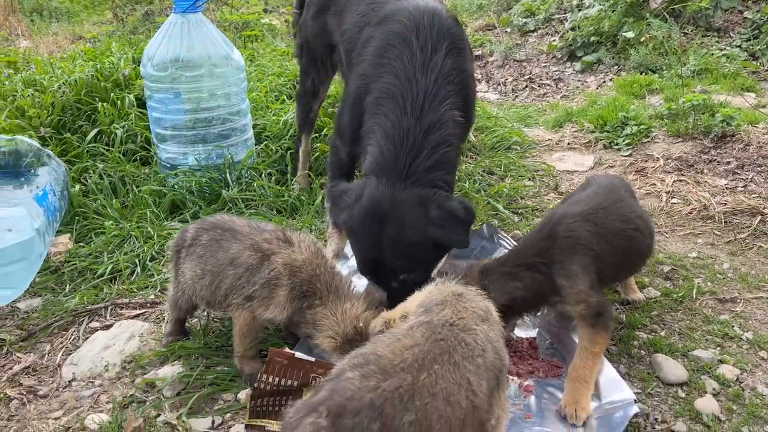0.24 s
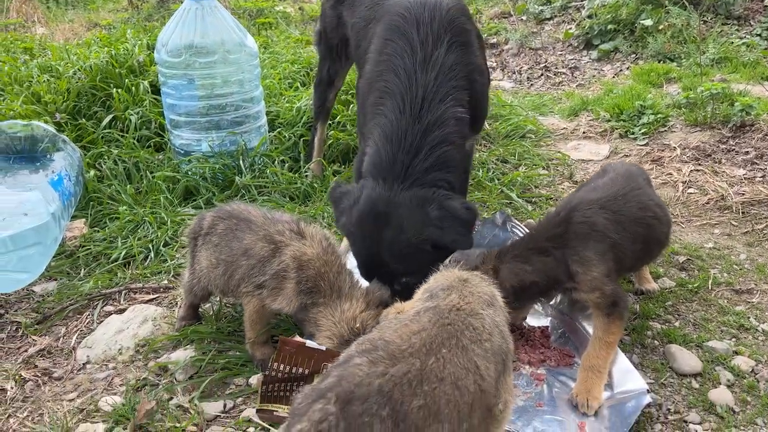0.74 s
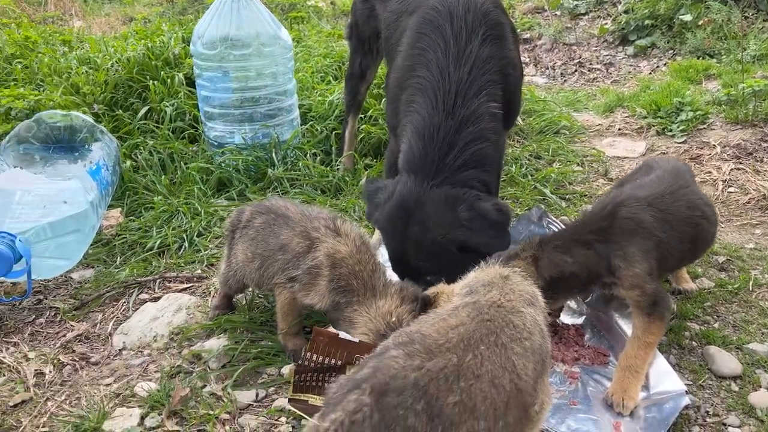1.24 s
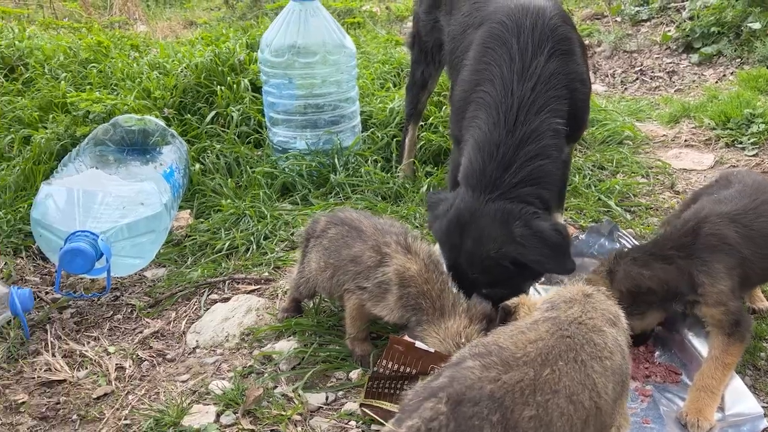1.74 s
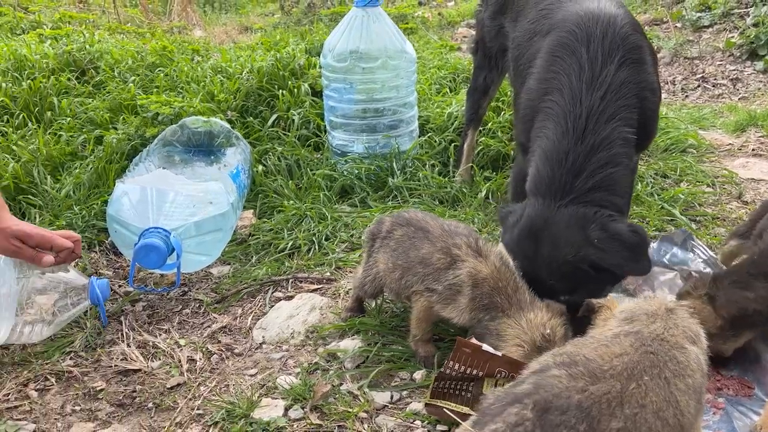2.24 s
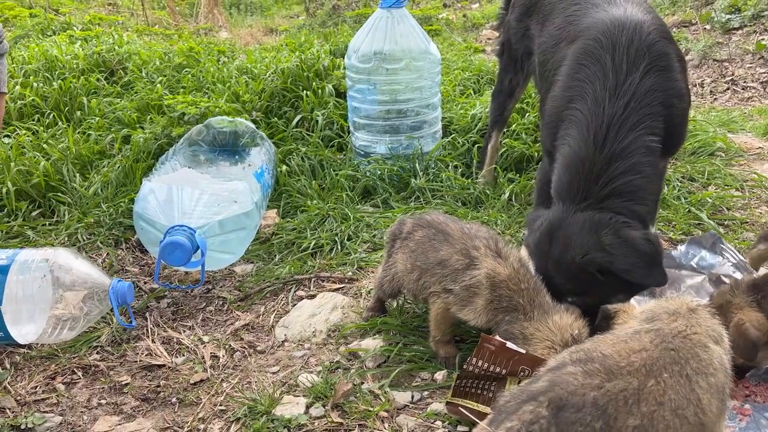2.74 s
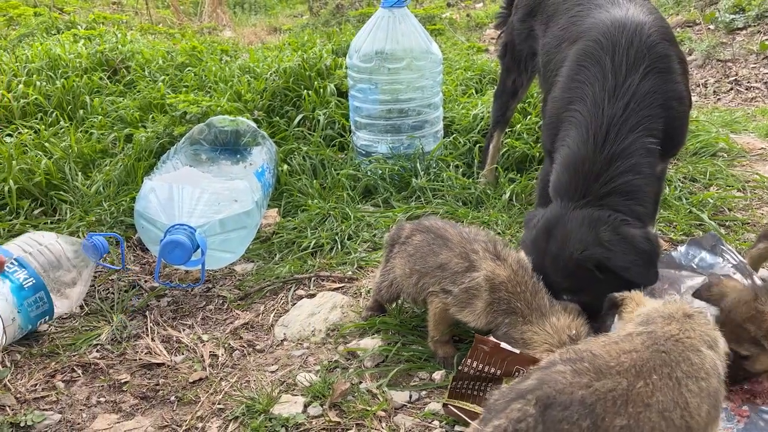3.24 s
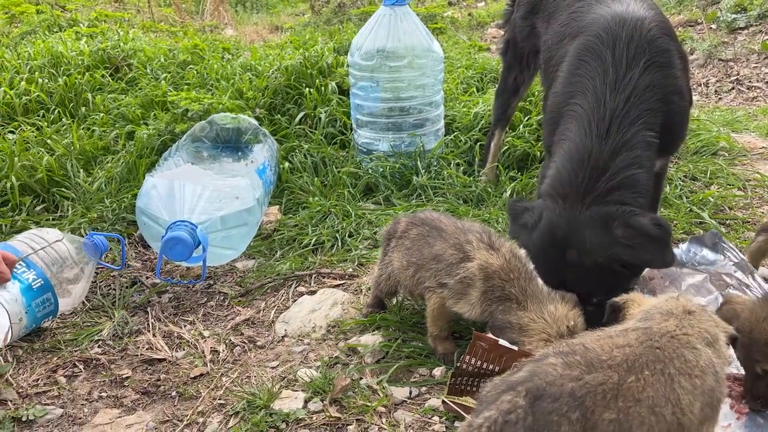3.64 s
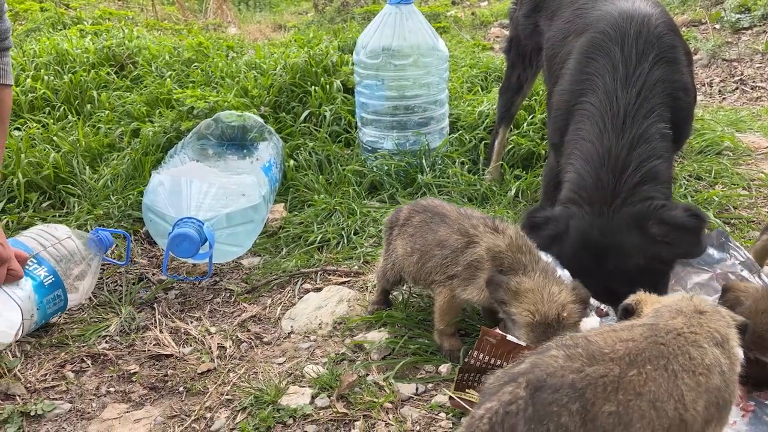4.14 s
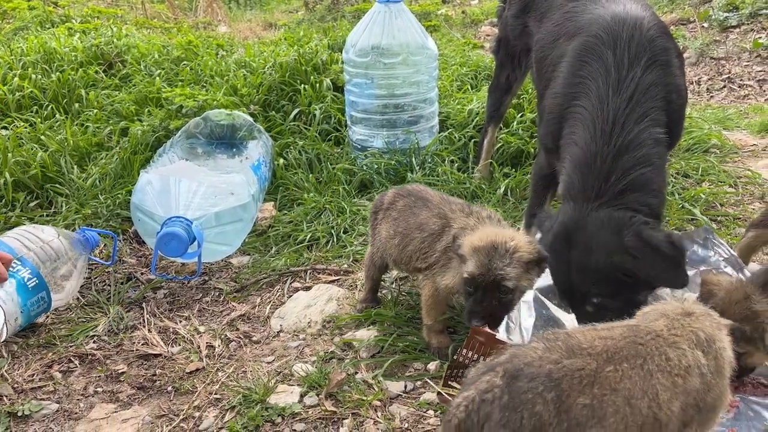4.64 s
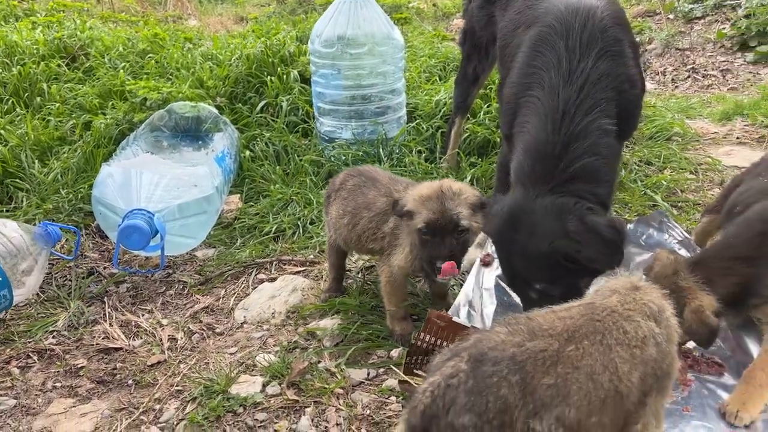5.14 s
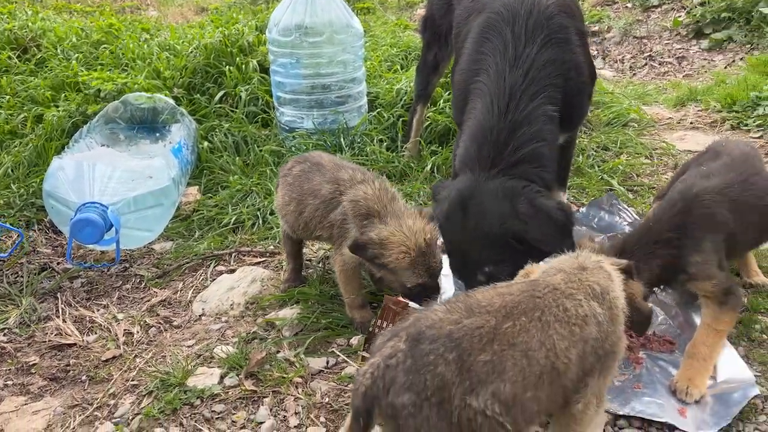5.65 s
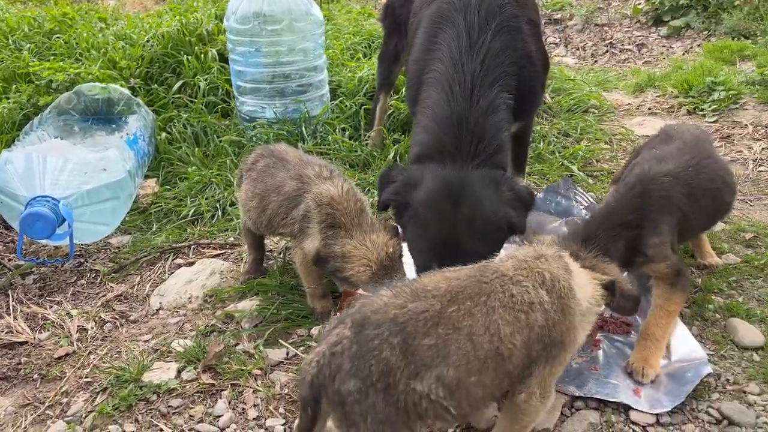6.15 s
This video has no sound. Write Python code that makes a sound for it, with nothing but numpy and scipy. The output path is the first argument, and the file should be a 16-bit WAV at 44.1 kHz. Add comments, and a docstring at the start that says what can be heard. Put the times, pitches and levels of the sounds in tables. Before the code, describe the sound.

Wet, hollow smacks and sharp plastic crackles come in an irregular stream as puppies feed from plastic bags on the ground. Small squelchy pops and a fine licking rustle fill the gaps. After a dense opening the sounds space out, a nose snorts briefly, and more smacks lead to one crisp snap at the end. It is all heard close up, over a low outdoor rumble.

```python
"""Puppies lapping wet food off plastic sheets

Under muzzles and paws the film buckles: single creases snap, crowds of them scrunch, and both excite
the modes of the sheet. Mouths smack open as hollow cavity resonances, air pockets burst in the food,
paws thud and a nose snorts. A fine rustle swells in between, with one faint squeak.
Two microphone ports pick it all up from close by, over a distant outdoor rumble."""
import sys
import numpy as np
from scipy import signal
from scipy.fft import rfft, irfft
from scipy.io import wavfile
from scipy.ndimage import uniform_filter1d

SR = 44100
rng = np.random.default_rng(int(sys.argv[2]) if len(sys.argv) > 2 else 0)


def master(y):
    """Save y as 16-bit WAV."""
    cut = np.clip(np.atleast_2d(y).T, -1, 1)
    pcm = np.round(cut * 32767)  # scale
    wavfile.write(sys.argv[1], SR, pcm.astype(np.int16))


N = 282240
HZ = np.fft.rfftfreq(N, 1 / SR)

# Spectra of the creasing film and of its airy treble: (frequency [Hz], spectral density [dB])
FILM_SPECTRUM = [(400, 19), (800, -3.5), (1300, -4), (2000, -0.5), (2700, 5), (3300, 0), (4500, -2.5),
                 (5500, -7), (6200, -4.5)]
SHEEN_SPECTRUM = [(5000, 5), (6500, 1.5), (7700, -0.5), (9000, 3), (11500, 2), (14000, -5.5), (15300, -7.5),
                  (16000, -53)]
# Mouths smacking open: (time [s], level [dB], cavity frequency [Hz], length [cycles])
MOUTH_SMACKS = [(0.0955, -3.5, 410, 3.2), (0.245, -17.5, 375, 6.6), (0.305, -17, 317, 5.6),
                (0.526, -13, 173, 3.6), (0.684, -17.5, 282, 1.3), (0.819, -32, 177, 3.1),
                (1.006, -17.5, 224, 2), (1.068, -25, 191, 1.7), (1.165, -21.5, 392, 9.7),
                (1.203, -16.5, 212, 2.3), (1.257, -9, 254, 2.2), (1.305, -11.5, 686, 4.5),
                (1.317, -27, 267, 2.9), (1.359, -24.5, 250, 4.1), (1.477, -20.5, 225, 2.5),
                (1.523, -24.5, 253, 1.4), (1.599, -15, 262, 2.15), (1.66, -13, 272, 2.3),
                (1.699, -10.5, 272, 3.6), (1.765, -9, 394, 2.6), (1.79, -16, 274, 6.3),
                (1.838, -24, 254, 1.7), (1.872, -19.5, 263, 3.5), (2.024, -13.5, 274, 5.2),
                (2.075, -25.5, 225, 4.2), (2.188, -18.5, 332, 4.2), (2.204, -16.5, 282, 9.8),
                (2.25, -30, 288, 1.7), (2.313, -30.5, 242, 7), (2.53, -27, 242, 13),
                (2.629, -17.5, 245, 6.1), (2.863, -18, 285, 6.7), (3.023, -14, 292, 5.5),
                (3.085, -15, 375, 2.6), (3.172, -13.5, 292, 3.5), (3.379, -18.5, 243, 7.6),
                (3.599, -26, 260, 2.9), (3.797, -24.5, 287, 3), (4.337, -18, 285, 4.2),
                (4.388, -16.5, 257, 6.1), (4.554, -23, 159, 7.4), (4.824, -16, 231, 5.3),
                (5.194, -20, 200, 1.35), (5.324, -18, 407, 3.4), (5.392, -25, 385, 5.9),
                (5.434, -23.5, 437, 5.5), (5.746, -25.5, 197, 0.91), (5.778, -9, 348, 6),
                (5.88, -27.5, 188, 4.6), (6.274, -18, 424, 1.8), (6.29, -21, 427, 5.8)]


def undb(db):
    """Amplitude ratio of a level in decibels."""
    return 10 ** (np.asarray(db) / 20)


def unit(x):
    """Normalisation to an rms of 1."""
    return x / np.sqrt(np.mean(x ** 2))


def unit_peak(x):
    """Normalisation to a peak of 1."""
    return x / np.max(np.abs(x))


def add(out, start, x):
    """Superposition of a short sound at a start time in seconds."""
    i = max(int(start * SR), 0)
    out[i:i + len(x)] += x[:N - i]


def curve(table):
    """Interpolation of (frequency [Hz], value) points on a logarithmic frequency axis."""
    hz, value = np.transpose(table)
    return np.interp(np.log(HZ + 1), np.log(hz + 1), value)


def colour(x, spectrum):
    """Spectral shaping to an rms of 1, with a roll-off past both ends of the table."""
    skirts = np.clip(HZ / spectrum[0][0], 0, 1) ** 4 * np.clip(spectrum[-1][0] / (HZ + 1), 0, 1) ** 4
    return unit(irfft(rfft(x) * undb(curve(spectrum)) * skirts, N))


def wander(rate_hz):
    """Random modulation: held values, smoothed twice, with a spread near 1."""
    hold = int(SR / rate_hz)
    steps = np.repeat(rng.standard_normal(N // hold + 1), hold)
    return 1.3 * uniform_filter1d(uniform_filter1d(steps, hold), hold)[:N]


def crackle(per_second, spread_db, hiss):
    """Shot noise: impulses at random moments with long-tailed sizes, over Gaussian hiss."""
    clicks = (rng.random(N) < per_second / SR) * undb(spread_db * rng.exponential(size=N))
    return unit(clicks * rng.standard_normal(N)) + hiss * rng.standard_normal(N)


def resonator(x, hz, q):
    """Forced response of one damped mode."""
    return signal.lfilter(*signal.iirpeak(hz, q, SR), x)


def outdoors():
    """Ambient noise: far rumble and air, with most of the energy at low frequencies."""
    # Outdoor background: (frequency [Hz], spectral density [dB])
    rumble_spectrum = [(22, -47), (33, -53), (43, 6.5), (52, 7), (75, 4.5), (150, -6), (264, -11),
                       (450, -31.5), (780, -19), (1400, -28), (4700, -38.5), (8100, -48), (11900, -69),
                       (14300, -46), (15500, -73)]
    return undb(-38.5) * colour(rng.standard_normal(N), rumble_spectrum)


def squeak():
    """Amplitude modulation: a thin, faint tone wavers in level."""
    start_s, length_s, hz = 0.595, 0.087, 5600
    out, t = np.zeros(N), np.arange(int(length_s * SR)) / SR
    envelope = undb(-58 + 4.9 * wander(90)[:len(t)]) * np.sqrt(np.sin(np.pi * t / length_s))
    add(out, start_s, envelope * np.sin(2 * np.pi * hz * t))
    return out


def nose(air):
    """Formant filtering: airflow excites the fixed resonances of a nose."""
    # Nasal resonances: (frequency [Hz], bandwidth [Hz], gain [dB])
    formants = [(1270, 260, 6), (2140, 180, -3), (2740, 200, 2), (3750, 250, -5), (4510, 170, -2),
                (5500, 900, -10)]
    return sum((-1) ** k * undb(db) * resonator(air, hz, hz / width)
               for k, (hz, width, db) in enumerate(formants))


def sticky_tongues(count):
    """Bubble resonance: tongues peeling off wet food burst tiny bubbles that ring and rise in pitch."""
    out, t = np.zeros(N), np.arange(600) / SR
    for when, pitch, sustain, size in rng.random((count, 4)):
        hz, decay_cycles = 600 * 6.5 ** pitch, 0.93 + 5 * sustain
        ring = np.sin(2 * np.pi * hz * t * (1 + 5 * t)) * np.exp(-t * hz / decay_cycles)
        add(out, when * N / SR, undb(-3.0 * np.log(size + 1e-3) - 8.0 * pitch) * ring)
    return unit(out)


def slurp():
    """Modulated noise: low, wet lapping swells exponentially into each smack and decays after it."""
    t = np.arange(N) / SR
    coarse_t, rise_s = t[::256], 0.0058
    swells = np.zeros(len(coarse_t))
    for start, db, hz, cycles in MOUTH_SMACKS:
        age, fall_s = coarse_t - start, 1.73 * cycles / hz
        swells += undb(min(db, -13) - 15) * np.exp(np.minimum(age / rise_s, -age / fall_s))
    envelope = undb(-48.5) + np.interp(t, coarse_t, swells)
    wet = colour(rng.standard_normal(N), [(110, -1.0), (170, 0.5), (260, 1.5), (420, -5.0), (800, -23.5)])
    return envelope * undb(2.5 * wander(25)) * wet


def rustle():
    """Friction noise: fine crinkling and licking, with hiss in fixed bands and a sheen of brushing fur and
    grass."""
    # Crinkling and licking: (time [s], rustle level [dB], sheen level [dB])
    activity = [(0.3, -99, -75), (0.82, -50.5, -64), (1.05, -55, -72), (1.18, -32.5, -47),
                (1.35, -64, -69.5), (1.78, -47.5, -62), (2.05, -63, -83), (2.19, -37.5, -54),
                (2.36, -63, -71.5), (2.65, -46, -55), (3.12, -46.5, -60), (3.75, -59.5, -74),
                (3.94, -49.5, -56), (4.19, -56.5, -70), (4.44, -68, -74), (4.95, -43.5, -65.5),
                (5.26, -54, -65.5), (5.6, -47.5, -66), (6.07, -53.5, -71), (6.25, -44.5, -68)]
    times, *levels = np.transpose(activity)
    rustle_db, sheen_db = (np.interp(np.arange(N) / SR, times, level) for level in levels)
    flicker_db = 3.5 * wander(30)
    film = colour(crackle(500, 2.4, hiss=0.97), FILM_SPECTRUM)
    sheen = colour(crackle(900, 2.5, hiss=0.96), SHEEN_SPECTRUM[2:])
    licking = sticky_tongues(count=900)
    banded_hiss = undb(4.5 * wander(9)) * unit(nose(crackle(1500, 3.2, hiss=0.66)))
    crinkle = undb(rustle_db + flicker_db) * (0.51 * film + 0.54 * licking + 0.28 * banded_hiss)
    return crinkle + undb(sheen_db + 1.16 * flicker_db) * sheen


def pops(events, roughness, rest_hz=0, rest_ratio=0):
    """Damped oscillation: a few cycles glide towards a resting pitch; longer pops are noisier."""
    out, t = np.zeros(N), np.arange(SR // 6) / SR
    for (start, db, hz, cycles), (phase, slack) in zip(events, rng.random((len(events), 2))):
        length, target_hz = cycles / hz, rest_hz + rest_ratio * hz
        glide_hz = target_hz * (1.196 * hz / target_hz) ** np.exp(-t / (length * (1.0 + 0.89 * slack)))
        ring = np.sin(2 * np.pi * (np.cumsum(glide_hz) / SR + phase))
        attack = 1 - np.exp(-t / (0.028 * length))
        decay = np.exp(-(t / length) ** 2) + 0.15 * np.exp(-t / (0.95 * length))
        band_noise = resonator(resonator(rng.standard_normal(len(t)), hz, q=1.2), hz, q=1.2)
        grit = roughness * np.sqrt(cycles / 4.5) * unit(band_noise)
        add(out, start, undb(db) * unit_peak((ring + grit) * attack * decay))
    return out


def thuds():
    """Soft impact: paws and handling set off a low, damped oscillation that falls in pitch."""
    # Impacts: (time [s], level [dB], frequency [Hz], length [cycles])
    impacts = [(0.143, -22, 67, 2.9), (4.271, -25, 98.6, 8.3), (4.553, -18.5, 66, 3.2),
               (5.644, -27, 97.5, 2.7)]
    return pops(impacts, roughness=0.47, rest_ratio=0.64)


def bubbles():
    """Bubble resonance: air pockets in the wet food rise in pitch as they burst."""
    # Bursts: (time [s], level [dB], frequency [Hz], length [cycles])
    air_pockets = [(1.826, -24.5, 650, 3.3), (1.85, -37, 1100, 3.6), (1.918, -32, 770, 4.2),
                   (2.063, -27, 1150, 14.7), (2.706, -19.5, 1000, 12), (2.868, -18.5, 617, 6.8),
                   (2.9, -36, 1230, 14), (3.066, -38, 1195, 6.7), (5.036, -26, 770, 3)]
    return pops(air_pockets, roughness=0.35, rest_ratio=1.45)


def snorts():
    """Turbulence: ragged puffs of air pass through a nose pressed into the food."""
    # Puffs of breath: (time [s], duration [s], level [dB])
    puffs = [(4.496, 0.049, -32.5), (4.557, 0.038, -22), (4.595, 0.016, -20)]
    rise_s, fall_s = 0.006, 0.002
    out, t = np.zeros(N), np.arange(SR // 10) / SR
    air = crackle(2500, 2.0, hiss=0.8) * undb(4.0 * wander(150))
    breath = unit(nose(air)) + undb(-15.5) * colour(air, SHEEN_SPECTRUM)
    for start, length, db in puffs:
        i = rng.integers(N - len(t))
        envelope = np.minimum(t / rise_s, 1) * np.exp(-np.maximum(t - length, 0) / fall_s)
        add(out, start, undb(db) * breath[i:i + len(t)] * envelope)
    return out


def smacks():
    """Cavity resonance: a mouth opens with a hollow pop that sinks in pitch."""
    return pops(MOUTH_SMACKS, roughness=0.52, rest_hz=180.3)


def sheet(x, scatter_db):
    """Modal superposition: the panels ring together, their strength and tension new at each crease."""
    # Modes of the sheet: (frequency [Hz], bandwidth [Hz], gain [dB])
    modes = [(837, 123, 11), (1199, 110, 15.5), (1512, 280, 13), (1678, 233, 12), (2076, 95, -3.5),
             (2487, 102, 2), (3020, 510, -15), (3185, 350, 5.5), (5060, 910, -1)]
    strength, tension = rng.standard_normal((2, len(modes)))
    out = np.zeros(len(x))
    for k, (hz, width, db) in enumerate(modes):
        ring = resonator(x, hz * (1 + 0.081 * tension[k]), q=hz / width)
        out += (-1) ** k * undb(db + scatter_db * strength[k]) * ring
    return out


def scrunches():
    """Crumpling noise: dense creases drive the modes of the sheet as it is dragged taut."""
    # Drags on the film: (time [s], duration [s], level [dB], relative treble level [dB])
    drags = [(0.005, 0.014, -34.5, -26), (0.21, 0.038, -50, -14), (0.29, 0.046, -39, -17),
             (2.177, 0.034, -49, -34), (2.218, 0.038, -43.5, -26), (2.288, 0.045, -47.5, -23),
             (3.371, 0.053, -44, -12), (3.765, 0.045, -46.5, -7), (4.376, 0.052, -42.5, -14),
             (2.816, 0.024, -42.5, -22), (5.094, 0.023, -63, -2), (4.81, 0.04, -33, -12),
             (4.859, 0.015, -46, -10), (1.485, 0.049, -48, -12.5), (2.531, 0.035, -45, -22),
             (2.634, 0.033, -43.5, -24), (4.606, 0.033, -49.5, -13), (4.723, 0.009, -59, -4.5),
             (2.061, 0.061, -47, -12), (5.366, 0.1, -45.5, -22), (5.738, 0.077, -38.5, -26),
             (6.246, 0.072, -43.5, -18)]
    rise_s, settle_s = 0.0017, 0.0028
    out, highpass = np.zeros(N), signal.butter(2, 1000, "high", fs=SR, output="sos")
    ragged = undb(1.5 * wander(120))
    creases = colour(crackle(1300, 3.7, hiss=0.49), FILM_SPECTRUM) * ragged
    sheen = colour(crackle(3300, 0.96, hiss=0.38), SHEEN_SPECTRUM) * ragged
    for start, length, db, treble_db in drags:
        t = np.arange(int((length + 0.082) * SR)) / SR
        i = rng.integers(N - len(t))
        decay = np.exp(-np.maximum(t - length, 0) / settle_s - 0.5 * t / length)
        envelope = np.minimum(t / rise_s, 1) * decay
        drive = creases[i:i + len(t)] * envelope
        ringing = signal.sosfilt(highpass, sheet(drive, scatter_db=1.0) + 0.028 * drive)
        treble = undb(treble_db) * unit(sheen[i:i + len(t)] * envelope)
        add(out, start, undb(db) * (unit(ringing) + treble))
    return out


def snap_envelope(t, t60):
    """Exponential decay of 60 dB in t60 seconds, with an attack of about half a millisecond."""
    return np.minimum(t / 0.00047, 1) * 1000 ** (-t / t60)


def snaps():
    """Snap-through buckling: a crease flips with a crack, then its panel and the sheet ring in noise."""
    # Flips: (time [s], level [dB], panel frequency [Hz], relative body [dB], relative treble [dB])
    flips = [(0.0044, -11.5, 2080, 4.5, -6), (0.0146, -19.5, 2330, -26, -8), (0.0928, -9.5, 1900, -19, -15),
             (0.243, -10.5, 2400, -25, -4.5), (0.265, -24, 3300, 2, -30), (0.3022, -13, 1860, 0, -6.5),
             (0.5235, -9, 1930, 5.5, -16.5), (0.5378, -6, 2230, -9, 3), (0.577, -36.5, 3500, -12, -12.5),
             (0.612, -42, 3800, -12, -10), (0.681, -4.5, 1780, -3, 1), (0.986, -31.5, 2200, 2.5, 1),
             (0.9968, -6, 1960, -7.5, 0.5), (1.143, -25.5, 2800, -21, 5), (1.168, -4.5, 1600, -8, -6.5),
             (1.201, -21.5, 2330, -17, -31), (1.233, -8, 3750, -7.5, 3.5), (1.2498, -13.5, 1970, -1, -55),
             (1.3037, -5, 1990, 4, 0.5), (1.3608, -19, 1790, 5, -14), (1.4303, -7, 2640, -15, -5.5),
             (1.4703, -24.5, 1830, 6, -9), (1.5926, -5.5, 1670, -8, -14), (1.62, -10.5, 2560, -27, -35),
             (1.6279, -4, 2950, -16, -8), (1.6614, -24, 1640, 2.5, -11), (1.695, -21, 2740, 6.5, -9.5),
             (1.7669, -15, 1800, 7, -6.5), (1.7902, -16.5, 1710, -2, -12), (1.8098, -23.5, 2500, -1.5, -45),
             (1.827, -23, 2420, 4.5, -48), (1.851, -16, 2000, -12, -46), (1.8686, -24.5, 4270, 2.5, -25),
             (1.9064, -22.5, 1870, 11, -54), (1.954, -39.5, 1540, 15.5, -23), (2.0091, -42, 1520, 21, -7),
             (2.0332, -14.5, 1770, -2.5, -52), (2.0405, -14.5, 4400, -4.5, -17.5),
             (2.0986, -26, 2330, 1.5, -8), (2.1142, -9, 1610, -13, -19.5), (2.1843, -35, 1520, 12.5, -11),
             (2.204, -23.5, 2230, 5.5, -17), (2.2403, -23, 4500, -29, -0.5), (2.2564, -23.5, 2180, 0, -14),
             (2.281, -30, 2470, -12, -6), (2.3085, -25.5, 2460, -3, -5), (2.526, -36.5, 1630, 12, -12),
             (2.577, -7.5, 3950, -4.5, -9), (2.6243, -23.5, 2450, 8, -27), (2.7063, -39, 2400, -17, -41),
             (2.8676, -31, 2530, 4, -25), (2.9004, -29.5, 2600, 7.5, -33), (3.004, -2.5, 3200, -8.5, -12.5),
             (3.0186, -19.5, 2630, 8.5, -4), (3.0659, -32.5, 2140, 13.5, -5), (3.084, -28, 2030, 1.5, -31),
             (3.172, -14, 2440, 4.5, -13), (3.24, -12, 4700, -3, -17), (3.3756, -20.5, 1960, 3, -4),
             (3.5972, -13.5, 2280, -1.5, -4), (3.7691, -27.5, 1530, 0.5, -8),
             (3.7981, -10.5, 2600, -12, -15), (4.3328, -7, 2030, -0.5, -11.5), (4.3697, -25, 1720, 4, -36),
             (4.391, -29, 2480, 6.5, -11), (4.4156, -21.5, 2600, 0.5, -9), (4.803, -26.5, 2550, 10, -19),
             (4.8168, -17.5, 2000, 7, 2), (4.834, -15.5, 2540, -32, -19), (4.8481, -21, 2370, -5, 2.5),
             (5.035, -30.5, 2220, 6.5, -11), (5.1169, -22, 3830, -36, 7.5), (5.1964, -20.5, 1830, 5.5, -55),
             (5.3217, -22.5, 2090, 3, -10), (5.39, -27, 1600, 11, -17), (5.4125, -22, 2410, 6, -12),
             (5.426, -24, 1970, 2.5, -12), (5.733, -27.5, 2040, -20, -4), (5.743, -13, 1830, 0, -24),
             (5.7832, -4.5, 1680, -3.5, -16.5), (5.876, -22.5, 1680, -4, -26), (5.952, -20, 2870, -5, -6.5),
             (6.1346, -29, 2070, 1.5, -3.5), (6.2912, 0, 2330, -17, -3), (6.343, -25.5, 1790, -2.5, -49)]
    out, t = np.zeros(N), np.arange(SR // 6) / SR
    body_band = signal.butter(2, [500, 1500], "band", fs=SR, output="sos")
    upper_band = signal.butter(2, 1500, "high", fs=SR, output="sos")
    grain = crackle(900, 2.1, hiss=0.92)  # smaller creases follow the first
    film, sheen = colour(grain, FILM_SPECTRUM), colour(grain, SHEEN_SPECTRUM)
    for start, db, panel_hz, body_db, treble_db in flips:
        time_scale = 0.045 * undb(-0.28 * db)  # softer snaps ring longer
        fall = lambda ratio: snap_envelope(t, ratio * time_scale)
        i = rng.integers(N - len(t))
        jolt = film[i:i + len(t)] * (1 + 1.5 * np.exp(-t / 0.0018))  # hardest at the flip itself
        panel = resonator(jolt * fall(0.35), panel_hz, q=6.0)
        drive = jolt * (fall(0.84) + undb(-33) * fall(3.7))  # a faint tail as the sheet settles
        ringing = sheet(drive, scatter_db=4.0) + 0.5 * drive
        # soft wet creases have little treble and a duller ring
        cutoff_hz = np.clip(9000 * undb(0.27 * (treble_db - 9.0)), 2300, 9000)
        lowpass = signal.butter(2, cutoff_hz, fs=SR, output="sos")
        upper = signal.sosfilt(lowpass, signal.sosfilt(upper_band, ringing))
        body = undb(body_db) * unit_peak(signal.sosfilt(body_band, ringing))
        crack = undb(treble_db) * unit_peak(sheen[i:i + len(t)] * (fall(0.23) + undb(-20) * fall(1.85)))
        add(out, start, undb(db) * (0.53 * unit_peak(panel) + 0.81 * unit_peak(upper) + body + crack))
    return out


def feeding():
    """Superposition of the near sources: mouths, noses, film and paws."""
    return smacks() + bubbles() + snorts() + snaps() + thuds() + scrunches() + rustle() + slurp() + squeak()


def ports(source, coherence):
    """Partial coherence: two microphone ports each hear a shared sound and a part of their own."""
    # Path difference: (frequency [Hz], phase lead of the left port [rad])
    phase_lead = [(0, 0), (170, .3), (520, 1.7), (1030, 2.4), (1300, 2.3), (1550, 4), (2670, 7.2),
                  (4740, 15.4), (6000, 16.6), (6400, 13), (7400, 12.2), (7800, 9.5), (11500, 6.4),
                  (16100, 3)]
    # Shading: (frequency [Hz], left minus right level [dB])
    balance = [(60, 1), (260, -1.5), (430, 1.5), (700, 2), (1030, 4.5), (1400, -1.5), (2070, -1), (3000, 1),
               (4200, 7), (5500, 9), (6500, -1), (8600, -3.5), (11000, 0)]
    hz, lead = np.transpose(phase_lead)
    left_gain = np.exp(0.5j * np.interp(HZ, hz, lead)) * undb(curve(balance) / 2)
    share = np.clip(curve(coherence), 0, 1)
    common, left, right = (rfft(source()) for _ in range(3))
    heard = np.sqrt(share) * common + np.sqrt(1 - share) * np.array([left, right])
    return irfft(heard * np.array([left_gain, 1 / left_gain]), N)


def scene():
    """Near and distant sound add in stereo: the feeding, over a slowly swelling rumble."""
    # Coherence between the ports, for near and far sound: (frequency [Hz], shared power [0-1])
    near_coherence = [(100, 1), (900, 0.95), (2700, 0.76), (4000, 0.72), (7500, 0.76), (8500, 0.88),
                      (11000, 0.94)]
    far_coherence = [(40, 0.8), (100, 0.82), (180, 0.97), (300, 0.97), (500, 0.9), (1000, 0.2), (3000, 0.3),
                     (6000, 0), (11000, 0.85)]
    swell = undb(2.0 * wander(3.984))
    return ports(feeding, near_coherence) + swell * ports(outdoors, far_coherence)


def record(dry):
    """Soft saturation rounds the loudest peaks, and a steep low-pass cuts the top."""
    cutoff_hz = 16300
    return signal.sosfilt(signal.ellip(8, 0.2, 70, cutoff_hz, fs=SR, output="sos"), np.tanh(dry))


dry = scene()
out = record(dry)
master(out)
```